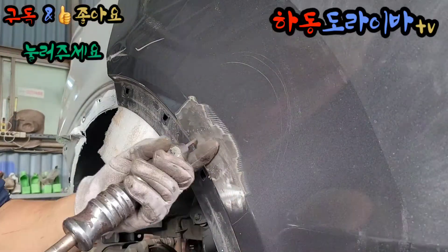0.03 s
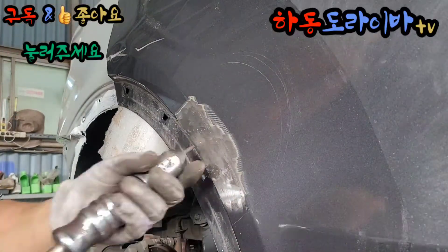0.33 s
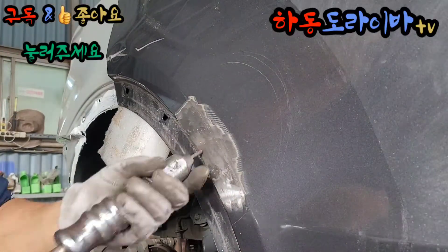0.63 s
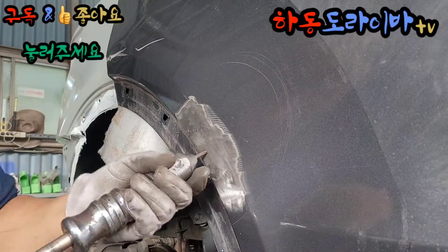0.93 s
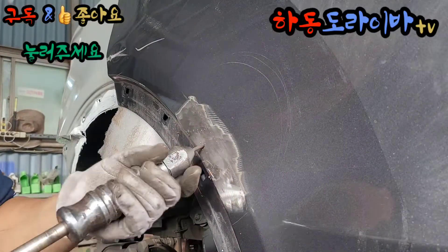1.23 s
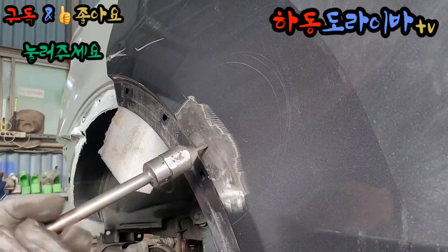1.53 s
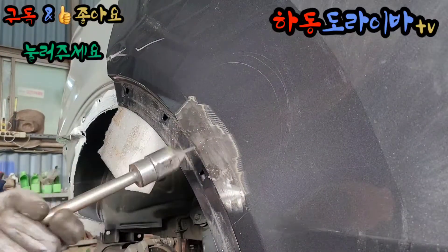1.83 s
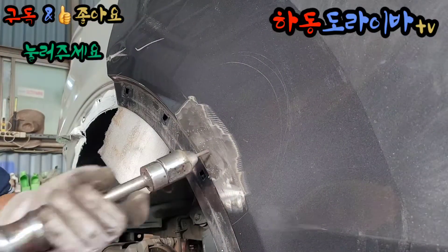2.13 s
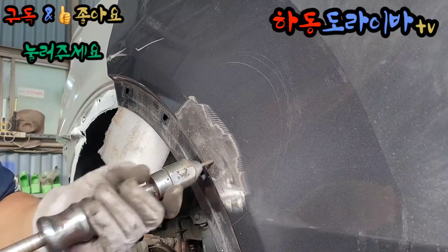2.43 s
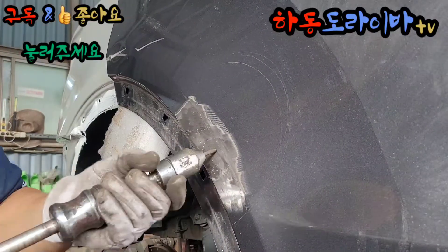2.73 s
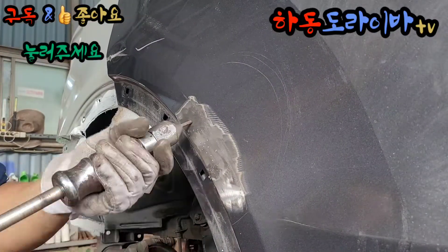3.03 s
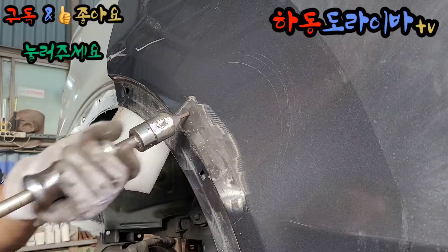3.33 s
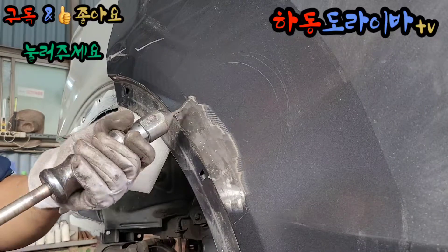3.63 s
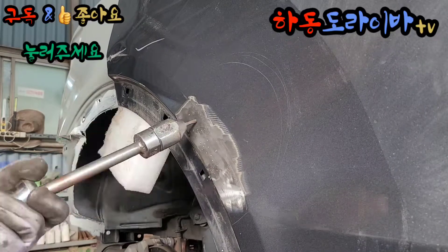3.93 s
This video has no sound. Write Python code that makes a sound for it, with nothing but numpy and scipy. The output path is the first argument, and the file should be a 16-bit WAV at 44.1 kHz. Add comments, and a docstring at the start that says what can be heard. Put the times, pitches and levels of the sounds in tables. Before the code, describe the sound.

Slide hammer knocking sharply on a steel car panel, with short weld spits between blows.

```python
"""A faint glove rub over a workshop's low rumble, then soft thuds: a slide-hammer dent puller is worked along a
car's steel wing, about four strokes a second. In a typical stroke the weight thuds against its forward stop,
the loose weight taps, a short spot weld spits and hums, and the weight knocks against its stop. The impact
excites the free vibration of rod and sheet: the rod rings and the panel booms, or clangs when the tip tears
free."""
import sys
import numpy as np
from scipy import signal
from scipy.fft import rfft, irfft
from scipy.io import wavfile
from scipy.ndimage import uniform_filter1d

SR = 44100
rng = np.random.default_rng(int(sys.argv[2]) if len(sys.argv) > 2 else 0)


def wav_record(signal):
    """Record a signal, one row per channel, as 16-bit PCM in the file named by sys.argv[1]."""
    frames = np.transpose(np.atleast_2d(signal))
    bounded = np.clip(frames, -1, 1)
    # unit amplitude maps onto the largest positive 16-bit level
    quanta = np.round(bounded * 32767).astype(np.int16)
    wavfile.write(sys.argv[1], SR, quanta)


N = 176400


def from_db(db):
    """Decibels to amplitude ratio."""
    return 10 ** (np.asarray(db) / 20)


def impulses(times, db):
    """Impulsive excitation: one sample for each event."""
    out = np.zeros(N)
    np.add.at(out, np.clip((times * SR).astype(int), 0, N - 1), from_db(db))
    return out


def noise(spectrum, size=N, ripple_db=0):
    """Spectral shaping: stereo noise of rms 1, its two sides coherent in the bass only."""
    hz = np.maximum(np.arange(size // 2 + 1) * SR / size, 1)
    points, db = np.transpose(spectrum)
    coherence = .92 / (1 + (hz / 635) ** 2)
    knots = np.arange(0, SR, 110)  # Hz
    ripple = ripple_db * np.interp(hz, knots, rng.standard_normal(len(knots)))
    gain = from_db(np.interp(np.log(hz), np.log(points), db) + ripple) * hz / np.hypot(hz, 20)
    mid, side = rfft(rng.standard_normal((2, size))) * gain
    x = irfft(np.sqrt(1 + coherence) * mid + np.sqrt(1 - coherence) * side * [[1], [-1]], size)
    return x / x.std()


def burst(times, db, spectrum, t60, attack_s):
    """Modal overlap: close modes that decay together are heard as fading noise."""
    fall, rise = from_db(-120 / (t60 * SR)), np.exp(-1 / (attack_s * SR))
    power = signal.lfilter([1 - rise], [1, -fall - rise, fall * rise], impulses(times, 2 * db) + 1e-18)
    return np.sqrt(np.abs(power)) * noise(spectrum)


def clank(times, db, spectrum, t60, attack_s):
    """Uneven excitation: a burst in which each event favours different modes."""
    out, t = np.zeros((2, N + SR)), np.arange(SR // 2) / SR
    envelope = np.sqrt(1 - np.exp(-t / attack_s)) * from_db(-60 * t / t60)
    for start, level in zip((times * SR).astype(int), db):
        out[:, start:start + len(t)] += from_db(level) * envelope * noise(spectrum, len(t), ripple_db=4)
    return out[:, :N]


def strike(times, db, modes, spread_db, detune):
    """Modal superposition: damped sinusoids, weighted and tuned anew at each contact."""
    out, t = np.zeros(N + SR), np.arange(SR // 3) / SR
    for start, level in zip((times * SR).astype(int), db):
        for k, (hz, mode_db, t60) in enumerate(modes):
            envelope = from_db(level + rng.normal(mode_db, spread_db) - 60 * t / t60)
            tone = np.sin(2 * np.pi * hz * rng.normal(1, detune) * t)
            out[start:start + len(t)] += (-1) ** k * envelope * tone
    return out[:N]


def flicker(depth_db, samples):
    """Random amplitude modulation: an uneven gain of rms 1."""
    wobble = uniform_filter1d(rng.standard_normal(N), samples)
    gain = from_db(depth_db * np.clip(wobble / wobble.std(), -2, 2))
    return gain / np.sqrt(np.mean(gain ** 2))


# background spectrum (frequency [Hz], level [dB])
RUMBLE = [(25, -13.5), (80, 0), (250, -17), (3000, -35), (16000, -49.5)]
def rumble():
    """Ambient noise: the hall's low rumble wavers in level."""
    return from_db(-38) * noise(RUMBLE) * flicker(depth_db=-3.5, samples=2500)


# spectra of rubbing or sizzling, scuffing and ringing steel (frequency [Hz], level [dB])
SIZZLE = [(300, -9), (1100, 3.5), (2100, -10), (16000, -39)]
SCUFF = [(350, 5), (800, -15.5), (1800, -10.5), (5000, -23.5), (16000, -36.5)]
STEEL_RING = [(600, -40), (1700, -2.5), (2900, 7.5), (4150, 9), (4650, -11), (8000, -5.5), (16000, -36)]
def glove():
    """Friction noise: a glove rubs along the rod while the tool rings faintly."""
    layers = [(-46.5, SIZZLE), (-46.5, SCUFF), (-53, STEEL_RING)]
    return sum(burst(np.zeros(1), db, spectrum, t60=4.1, attack_s=0.005) for db, spectrum in layers)


# low modes of the sheet (frequency [Hz], level [dB], t60 [s])
PANEL_MODES = [(55.7, 1.5, .13), (85.6, 1.5, 0.18), (127.3, -4.5, 0.2), (204.3, -6, 0.087),
               (347.4, -6.5, 0.11)]
def panel(times, db):
    """Plate vibration: the sheet booms in its low modes, at a slightly different pitch each time."""
    mid, side = [strike(times, db, PANEL_MODES, spread_db=2, detune=.08) for _ in range(2)]
    return mid + from_db(-15) * side * [[1], [-1]]


# the weight thuds against its forward stop (time [s], level [dB])
TOUCHES = [(0.111, -23), (0.143, -27.5), (0.176, -21), (0.485, -10.5), (0.766, -16.5), (1.026, -12.5),
           (1.287, -11.5), (1.535, -16.5), (1.797, -17), (2.058, -15), (2.3, -14), (2.554, -14.5),
           (2.818, -13), (3.142, -16), (3.364, -15.5), (3.682, -26), (3.81, -14.5), (3.861, -18)]
def touches():
    """A soft contact acts as a low-pass filter: the weight lands on its forward stop with a thud and a little
    scuff."""
    times, db = np.transpose(TOUCHES)
    softness = signal.butter(2, 260, fs=SR, output="sos")
    thud = signal.sosfilt(softness, panel(times, db - 6.5) + 1e-18)
    return thud + burst(times, db - 7, SCUFF, t60=0.07, attack_s=0.0028)


# the loose weight taps the rod (time [s], level [dB])
TAPS = [(0.191, -24), (0.4711, -15.5), (0.489, -10.5), (0.78, -5), (1.275, -4), (1.5651, -11.5),
        (1.8108, -12), (2.075, -10.5), (2.6998, -9), (2.8194, -11), (3.112, -20), (3.3919, -15.5)]
# modes excited by a tap (frequency [Hz], level [dB], t60 [s])
CLINK_MODES = [(2730, 0.5, 0.041), (3680, -6.5, 0.048), (6770, -11, 0.032), (11920, -12, 0.046)]
# contact spectrum (frequency [Hz], level [dB])
TICK = [(250, 12), (6000, 12.5), (16000, -8)]
def taps():
    """A brief contact has a broad spectrum: the gripped weight ticks and clinks."""
    times, db = np.transpose(TAPS)
    clink = np.array([strike(times, db - 15, CLINK_MODES, spread_db=.5, detune=.0095) for _ in range(2)])
    return burst(times, db - 14.5, TICK, t60=0.03, attack_s=0.00025) + clink


# spot welds (time [s], level [dB])
WELDS = [(0.263, -13), (0.5377, -17.5), (0.8104, -18), (1.0778, -19.5), (1.3442, -20), (1.5911, -19),
         (1.85, -19.5), (2.0928, -22), (2.342, -20), (2.601, -20), (2.8842, -18.5), (3.1655, -18.5),
         (3.425, -18.5), (3.921, -17)]
# spectra of sparks and of the shaking sheet (frequency [Hz], level [dB])
SPIT = [(500, 3), (3200, 7.5), (6000, 5.5), (16000, -7.5)]
FLUTTER = [(40, -21), (110, 6), (270, -5), (360, -9), (580, -11), (800, -25.5), (2000, -34)]
def welds():
    """Electrical discharge: the current strikes with a flash, sparks spit and the sheet drones."""
    times, db = np.transpose(WELDS)
    spit_t60, hum_t60 = 0.3, 0.26  # s
    flash = clank(times, db - 2, SPIT, t60=0.073, attack_s=0.0036)
    spit = burst(times, db - 15.5, SPIT, spit_t60, attack_s=0.0012)
    sizzle = clank(times + 0.014, db - 7, SIZZLE, t60=0.13, attack_s=0.00053)
    tone = hum(times, db + 3, hum_t60)
    drone = burst(times, db - 7.5, FLUTTER, hum_t60, attack_s=0.0082)
    return flash + spit + sizzle + tone + drone + crackle(times, db - 10, spit_t60)


def hum(times, db, t60):
    """Forced vibration: the sheet hums under the weld with a sagging pitch."""
    out, t = np.zeros(N + SR), np.arange(SR // 4) / SR
    nominal_hz = 155.6 + 39 * np.exp(-t / 0.036)
    phase = 2 * np.pi * np.cumsum(nominal_hz) / SR
    envelope = (1 - np.exp(-t / 0.0086)) * from_db(-60 * t / t60)
    for start, level in zip((times * SR).astype(int), db):
        out[start:start + len(t)] += from_db(level) * envelope * np.sin(rng.normal(1, .08) * phase)
    return out[:N]


def crackle(times, db, t60, sparks_per_s=500):
    """A Poisson process: single sparks snap at random, weaker as the weld dies down."""
    age = np.cumsum(rng.exponential(1, (len(times), 40)), axis=1) / sparks_per_s
    spark_db = db[:, None] + 10 * (rng.random(age.shape) - .5) - 60 * age / t60
    return burst(times[:, None] + age, spark_db, SPIT, t60=.003, attack_s=.00005)


# the weight hits its stop (time [s], knock level [dB], boom level [dB], clang level [dB])
BLOWS = [(0.3403, -12, -23, -27.5), (0.609, -11.5, -43, -18.5), (0.8805, -11.5, -36, -22.5),
         (1.1494, -12.5, -21.5, -29.5), (1.4205, -12.5, -22.5, -31.5), (1.6528, -12.5, -22.5, -34),
         (1.9176, -13.5, -24, -20), (2.1624, -11.5, -24, -32.5), (2.4069, -15, -36.5, -20),
         (2.6735, -13, -23.5, -34), (2.9408, -13, -24, -31), (3.2419, -14, -23.5, -33),
         (3.492, -10.5, -24, -33), (3.684, -57, -47.5, -42.5)]
# spectra of the impact and of the sheet's upper modes (frequency [Hz], level [dB])
CRACK = [(500, -10), (3300, 10.5), (4800, 4), (7000, 5), (10000, -2.5), (16000, 1.5)]
CLANG = [(720, -11), (1060, 2.5), (1300, -6.5), (1700, 5), (2200, -17.5), (16000, -18)]
def knocks():
    """Momentum transfer: the stop cracks, the tool rings, the jerked panel booms, rebounds and clangs."""
    times, db, boom_db, clang_db = np.transpose(BLOWS)
    chatter = flicker(depth_db=3, samples=90)
    contact = np.arange(3)[:, None]  # three quick contacts per blow
    crack = burst(times + 0.0017 * contact, db - 2 + 0.5 * contact, CRACK, t60=0.013, attack_s=0.00022)
    linger = burst(times, db - 26, STEEL_RING, t60=0.28, attack_s=0.012)
    ring = clank(times, db - 7.5, STEEL_RING, t60=0.12, attack_s=0.0028) * chatter
    ring += rod(times, db - 11)
    clang = clank(times, clang_db + 6, CLANG, t60=0.12, attack_s=0.0031) * chatter
    rebound = panel(times + 0.01274, boom_db + 8)
    pull = -panel(times, boom_db + 4)
    return crack + ring + linger + clang + pull + rebound + rattle(times, boom_db + 10)


# modes of the steel tool (frequency [Hz], level [dB], t60 [s])
ROD_MODES = [(2900, -19, 0.052), (3613, -10, 0.27), (3820, -10.5, 0.23), (4200, -10, 0.082),
             (6970, -15, 0.2), (11960, -1.5, 0.083)]
def rod(times, db):
    """Free vibration of a bar: its modes reach each side with different strengths."""
    return np.array([strike(times, db, ROD_MODES, spread_db=3.5, detune=.007) for _ in range(2)])


def rattle(times, db, gap_s=.019, loss_db=7.5):
    """Dissipative impacts: the loose sheet slaps five times, unevenly and ever more weakly."""
    slap = np.arange(5)
    slap_times = times[:, None] + gap_s * (slap + .5 * rng.random((len(times), len(slap))))
    return burst(slap_times, db[:, None] - loss_db * slap, FLUTTER, t60=0.065, attack_s=0.0025)


# spectrum of the hall's reflections (frequency [Hz], level [dB])
ROOM = [(500, 4), (3600, 5), (16000, -7.5)]
def reverberation(direct, t60=0.39):
    """Diffuse field: the hall's reflections build up, then decay exponentially."""
    t = np.arange(SR) / SR
    tail = noise(ROOM)[:, :SR] * from_db(-60 * t / t60) * (1 - np.exp(-t / 0.021))
    tail /= np.sqrt(np.sum(tail ** 2, axis=1, keepdims=True))
    return from_db(-19.5) * signal.fftconvolve(direct, tail, axes=1)[:, :N]


def scene():
    """Superposition: rumble, the nearby tool and its reflections, a little weaker on the left."""
    background = rumble()
    direct = glove() + touches() + taps() + welds() + knocks()
    return (background + direct + reverberation(direct)) * from_db([[-1.2], [0]])


def record(dry):
    """Soft saturation rounds the peaks; a low-pass filter cuts the highest treble."""
    lowpass = signal.ellip(10, .1, 80, 16100, fs=SR, output="sos")
    return signal.sosfilt(lowpass, np.tanh(dry))


dry = scene()
out = record(dry)
wav_record(out)
```